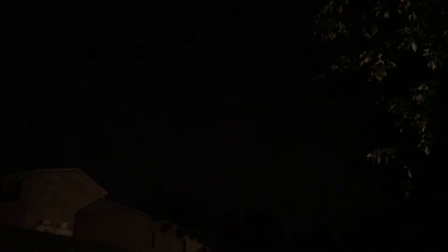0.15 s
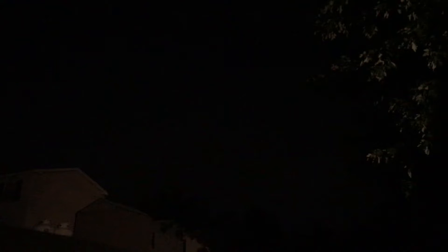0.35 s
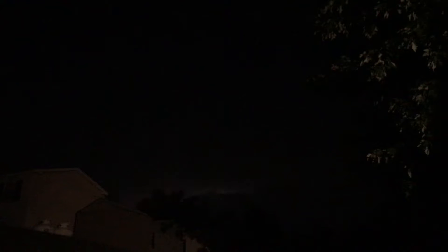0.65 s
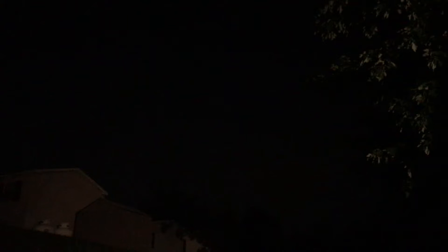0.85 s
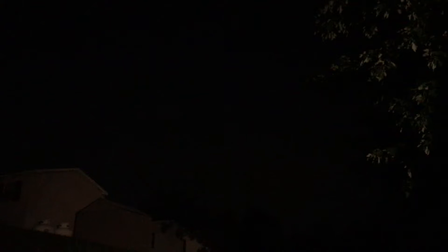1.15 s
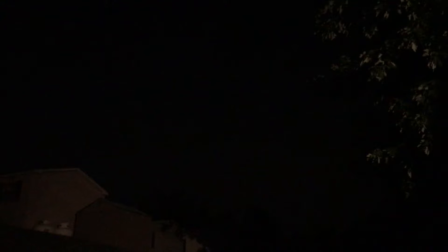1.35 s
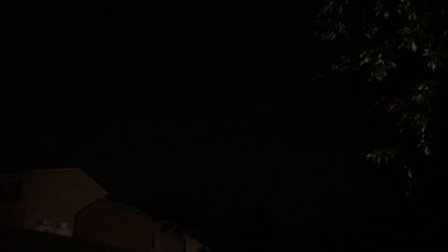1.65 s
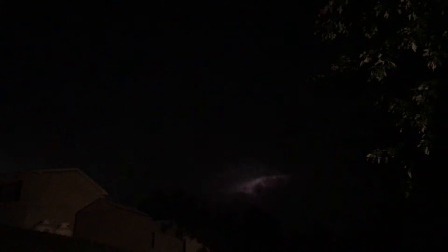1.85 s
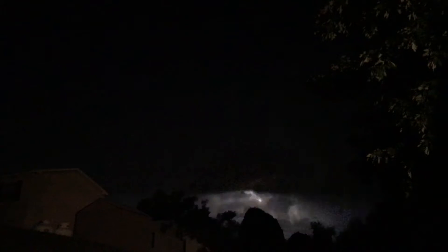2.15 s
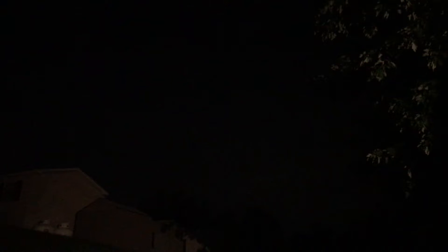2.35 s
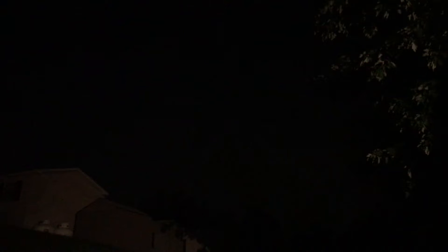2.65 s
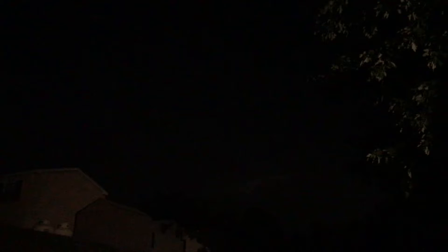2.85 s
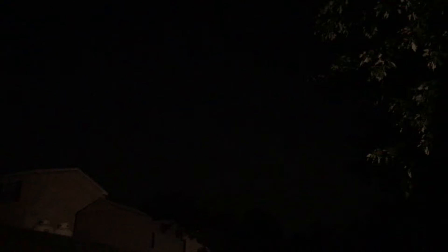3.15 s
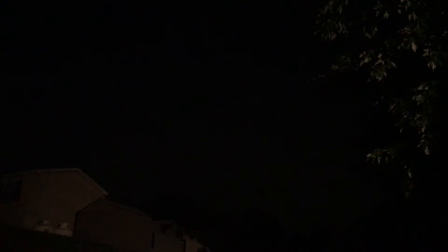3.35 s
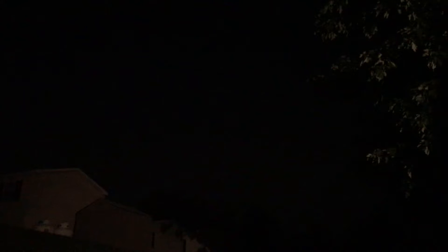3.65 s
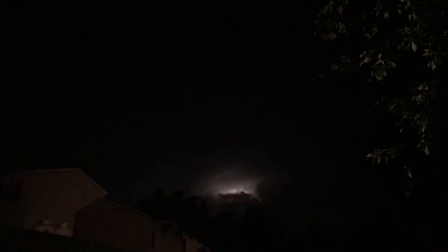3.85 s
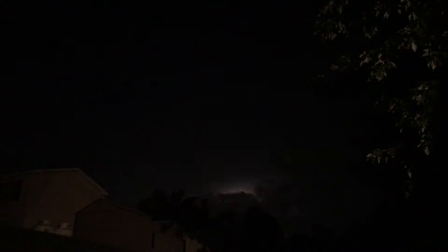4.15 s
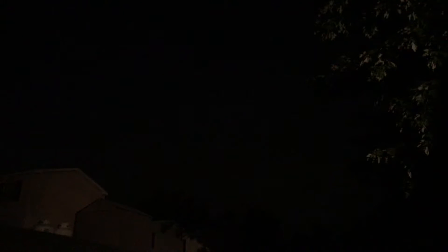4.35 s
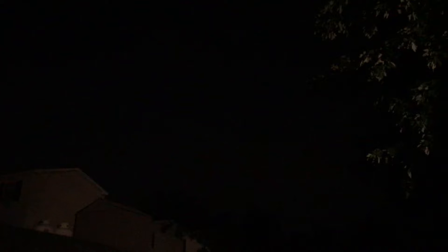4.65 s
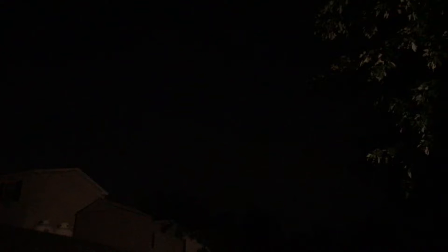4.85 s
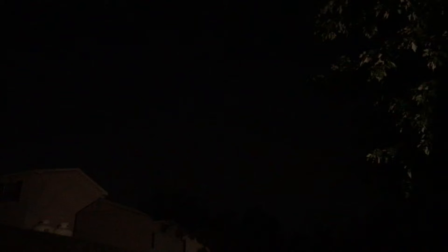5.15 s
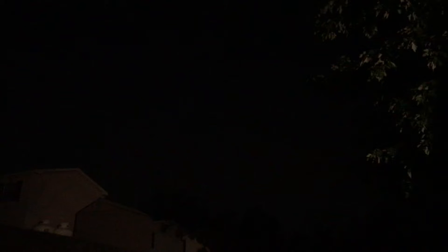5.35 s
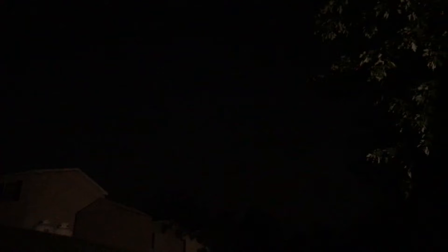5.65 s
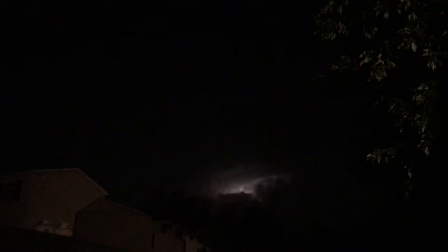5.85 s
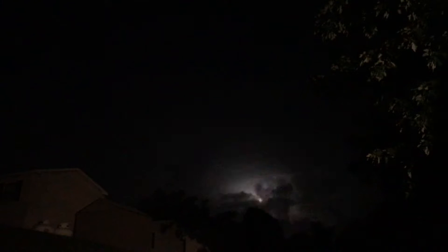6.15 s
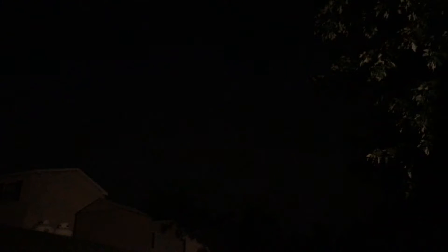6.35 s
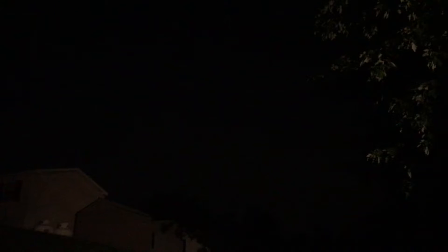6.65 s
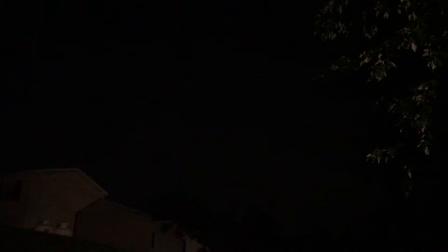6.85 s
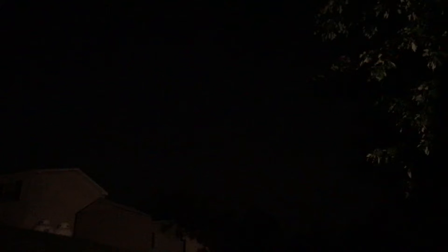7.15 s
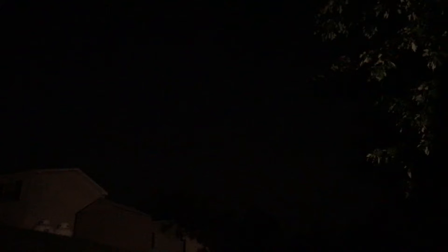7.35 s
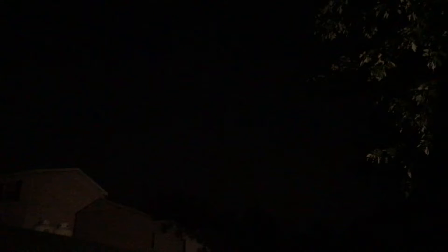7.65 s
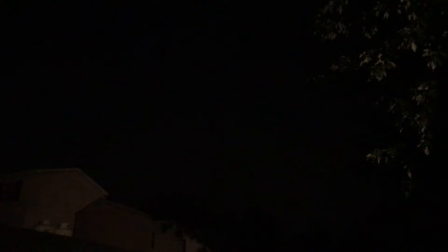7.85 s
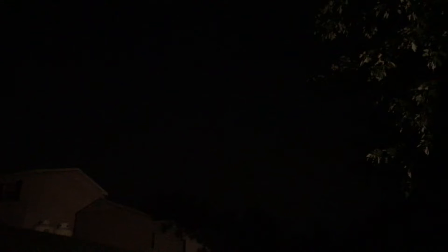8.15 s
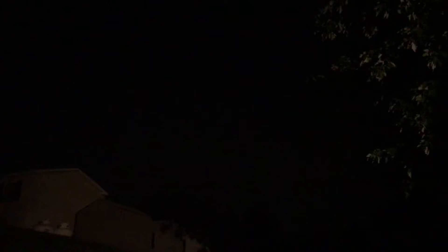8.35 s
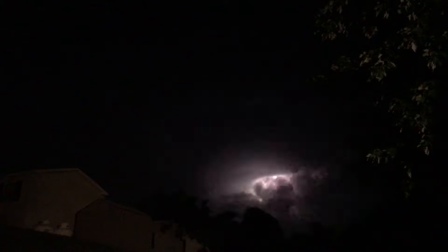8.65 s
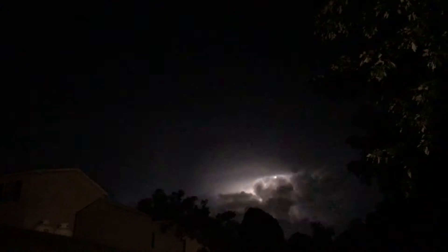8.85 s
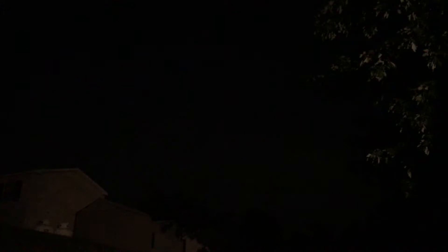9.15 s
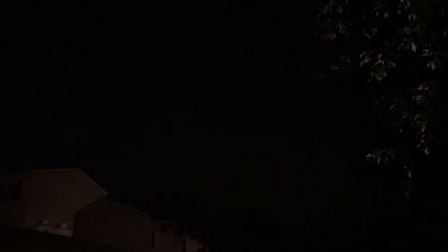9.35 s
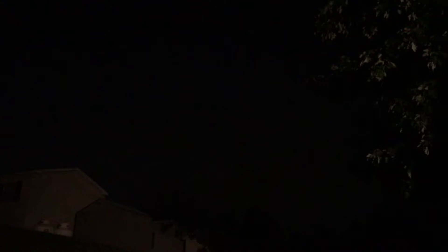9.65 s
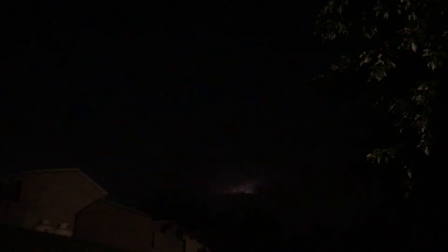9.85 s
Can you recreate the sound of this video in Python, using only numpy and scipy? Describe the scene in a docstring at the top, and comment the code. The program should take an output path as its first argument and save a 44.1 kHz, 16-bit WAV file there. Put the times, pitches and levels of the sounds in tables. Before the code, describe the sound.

A chorus of crickets throbs about four times a second on a warm night, with brief nearer trills, soft katydid rasps and a faint low machine hum.

```python
"""A chorus of small crickets throbs about four times a second in a yard on a warm night: noise rung by wings.
A nearer cricket trills now and then and another trills on, both as sliding tones; far ones blur into shimmer.
Katydids rasp as bursts of tooth noise over a swelling hiss of far ones. A cooling unit buzzes and hums in
steady and wavering sines over a low wash of coloured noise. One microphone feeds both channels."""
import sys
import numpy as np
from scipy import signal
from scipy.fft import rfft, irfft
from scipy.io import wavfile
from scipy.ndimage import uniform_filter1d

SR = 44100
rng = np.random.default_rng(int(sys.argv[2]) if len(sys.argv) > 2 else 0)


def level_to_linear(level):
    """Convert decibel levels to linear amplitude factors, elementwise."""
    exponent = np.asarray(level, float) / 20
    return 10 ** exponent


def unload_audio(sound):
    """Save the sound as a 16-bit wav file, at the path given as the first command line argument."""
    columns = np.transpose(np.atleast_2d(sound))
    # keep every value between -1 and 1, then stretch to whole-number steps
    steps = np.round(np.clip(columns, -1, 1) * 32767)
    wavfile.write(sys.argv[1], SR, steps.astype(np.int16))


N = 440559


def evened(x):
    """Scales to rms 1."""
    return x / np.sqrt(np.mean(x ** 2) + 1e-20)


def coloured(x, points):
    """Filters by (Hz, dB) points, interpolated over log frequency."""
    hz, db = np.transpose(points)
    bins_hz = np.fft.rfftfreq(len(x), 1 / SR)
    gain_db = np.interp(np.log(bins_hz + 1), np.log(hz + 1), db)
    return irfft(rfft(x) * level_to_linear(gain_db), len(x))


def slow(size):
    """Slow random wander of rms 1: noise smoothed twice over size samples."""
    once = uniform_filter1d(rng.standard_normal(N), size)
    return evened(uniform_filter1d(once, size))


def place(at_s, sounds):
    """Sums the rows of sounds, each centred on its time."""
    size = sounds.shape[1]
    middle = np.round(np.asarray(at_s) * SR).astype(int)[:, None]
    index = middle + np.arange(size) - size // 2 + SR  # a spare second at each end
    return np.bincount(index.ravel(), sounds.ravel(), N + 2 * SR)[SR:SR + N]


def strokes(hz, fall_hz, ms, edge, octave_db, phase=None):
    """Wing strokes: tones that slide down within each stroke, with a weak octave; one row a stroke."""
    u = np.linspace(-.5, .5, round(ms * SR / 1000))
    phase = rng.random(len(hz)) if phase is None else phase  # in turns
    turns = (hz[:, None] * u - fall_hz[:, None] * u ** 2 / 2) * ms / 1000 + phase[:, None]
    tone = np.sin(2 * np.pi * turns) + level_to_linear(octave_db) * np.sin(2 * 2 * np.pi * turns)
    return tone * signal.windows.tukey(len(u), edge)


def yard(x, wet_db, t60_s):
    """Walls and stirring leaves scatter a short dying tail: four noise tails, faded in and out in turn."""
    t = np.arange(SR // 4) / SR
    tails = rng.standard_normal((4, len(t))) * level_to_linear(-60 * t / t60_s) * (t > .004)
    tails /= np.linalg.norm(tails[0])
    turn = np.arange(N) / SR * 7 + np.arange(4)[:, None] * np.pi / 4  # 7 rad/s
    wet = signal.oaconvolve(x * np.sin(turn) ** 3, tails, axes=1)[:, :N].sum(0)
    return x + level_to_linear(wet_db) * wet


# Compressor buzz. Each row: multiple of the shaft speed, level in dB rms.
BUZZ_PARTIALS = [(4, -59), (6, -65), (10, -76), (12, -75), (13, -67), (14, -76), (16, -69), (18, -71),
                 (19, -75), (20, -64), (22, -65), (24, -72), (25, -64), (26, -77), (27, -70), (32, -77),
                 (35, -80), (44, -80), (45, -79), (46, -73), (47, -79), (48, -77), (49, -75), (51, -81),
                 (56, -80), (58, -80), (66, -81), (67, -74), (68, -75), (73, -76), (75, -81), (76, -79),
                 (78, -75), (79, -77), (81, -71), (82, -80), (83, -78), (87, -80)]
# Fan tones. Each row: mean frequency in Hz, level in dB rms.
FAN_TONES = [(56.1, -48.0), (112.2, -54.9), (240.1, -64.5), (468.7, -76.5), (477.8, -76.1), (506.3, -75.8),
             (512.3, -62.8)]


def cooling_unit():
    """Steady multiples of the compressor shaft speed, and fan tones whose pitch wavers a little."""
    SHAFT_HZ, WAVER_RMS = 58.3515, 0.00202  # waver as a share of the pitch
    t = np.arange(N) / SR
    buzz = sum(level_to_linear(db) * np.sin(2 * np.pi * (k * SHAFT_HZ * t + rng.random())) for k, db in BUZZ_PARTIALS)
    waver = evened(uniform_filter1d(rng.standard_normal((len(FAN_TONES), N)), SR // 4, axis=1))
    fan = np.zeros(N)
    for (hz, db), w in zip(FAN_TONES, waver):
        turns = hz * np.cumsum(1 + WAVER_RMS * w) / SR + rng.random()
        fan += level_to_linear(db) * np.sin(2 * np.pi * turns)
    return np.sqrt(2) * (buzz + fan)


# Neighbourhood wash and microphone hiss. Each row: frequency in Hz, relative density in dB per Hz.
WASH_COLOUR = [(20, -42), (35, -19), (55, 0), (95, -7), (125, -3), (230, -9), (440, -19.5), (750, -24.5),
               (1300, -23), (2000, -30), (2700, -28.5), (3600, -34), (4950, -30.5), (9000, -67),
               (15300, -50.5)]


def wash():
    """Smooth distant noise, mostly low."""
    WASH_DB = -43
    return level_to_linear(WASH_DB) * evened(coloured(rng.standard_normal(N), WASH_COLOUR))


# Far crickets by species. Each row: pitch in Hz, pitch spread in Hz rms, level in dB rms,
# strokes per second (up to 14000 strokes in all), stroke length in ms.
FAR_SPECIES = [(3170, 83, -65.5, 900, 14), (3930, 55, -73, 500, 16), (4733, 53, -70, 500, 12),
               (5396, 100, -60, 900, 10), (5763, 97, -56.5, 1500, 10.3), (6030, 97, -58.5, 470, 11.2)]


def far_crickets():
    """Many unseen singers: strokes at random moments, pitches scattered round each species."""
    out = np.zeros(N)
    for hz, spread_hz, level_db, per_s, ms in FAR_SPECIES:
        count = min(14000, round(per_s * N / SR))
        at, loud = rng.random((count, 2)).T
        pitch_hz = hz + spread_hz * rng.standard_normal(count)
        sounds = (0.99 + loud)[:, None] * strokes(pitch_hz, .02 * pitch_hz, ms, 0.83, -41)
        out += level_to_linear(level_db) * evened(place(at * N / SR, sounds))
    return out


def triller():
    """An unbroken run of falling strokes in the middle distance; its level wavers slowly."""
    RATE_PER_S, LEVEL_DB, WAVER_DB, UNEVEN_DB = 86.2, -53, 2.5, 0.83
    at_s = np.arange(0, N / SR, 1 / RATE_PER_S)
    late, loud = rng.standard_normal((len(at_s), 2)).T
    waver = slow(size=9000)[(at_s * SR).astype(int)]
    size = level_to_linear(LEVEL_DB + WAVER_DB * waver + UNEVEN_DB * loud)
    tones = strokes(np.full(len(at_s), 5600), np.full(len(at_s), 800), 9.3, 0.44, -45)
    return yard(place(at_s + .0004 * late, size[:, None] * tones), -6.5, 0.09)


# Colour of the far katydids' hiss. Each row: frequency in Hz, relative density in dB per Hz.
HISS_COLOUR = [(5500, -20), (6200, -7.5), (8000, 1.5), (9500, -4), (11500, -16.5), (13000, -15),
               (15000, -40)]
# Swells of that hiss. Each row: middle in seconds, peak in dB before flutter, added in power to the floor.
HISS_SWELLS = [(.25, -63), (1.3, -60), (1.87, -60), (2.4, -62), (3.6, -63), (4.45, -63), (5.4, -62.5),
               (6.42, -64), (7.0, -64), (7.45, -59), (8.35, -58), (9.45, -62.5)]


def far_katydids():
    """Far katydids blur to a fluttering hiss: coloured noise with bell-shaped swells, about one a second."""
    SWELL_S, FLOOR_DB, FLUTTER_DB = 0.17, -65.5, 1.6
    t = np.arange(0, N, 100) / SR
    power = level_to_linear(FLOOR_DB) ** 2
    power = power + sum(level_to_linear(db) ** 2 * np.exp(-((t - s) / SWELL_S) ** 2) for s, db in HISS_SWELLS)
    level = np.interp(np.arange(N) / SR, t, np.sqrt(power)) * level_to_linear(FLUTTER_DB * slow(size=1800))
    return level * evened(coloured(rng.standard_normal(N), HISS_COLOUR))


# Near cricket trills. Each row: first stroke in seconds, last stroke in seconds, strokes,
# stroke peak in dB before unevenness and echoes.
NEAR_TRILLS = [(.0035, 0.168, 12, -32), (1.823, 2.008, 13, -33.5), (4.001, 4.154, 11, -33),
               (5.457, 5.606, 11, -33), (6.939, 7.106, 12, -33), (8.698, 8.85, 11, -33)]


def near_cricket():
    """Even strokes near 66 a second; the first is low and faint, pitch later sags, and a wall sends them back."""
    OCTAVE_DB, ECHO_DB, ECHO_S = -40, -13, .0135
    out = np.zeros(N)
    for first_s, last_s, count, level_db in NEAR_TRILLS:
        k = np.arange(round(count))
        pitch, loud, slip = rng.standard_normal((len(k), 3)).T
        at_s = np.round(np.linspace(first_s, last_s, len(k)) * SR) / SR
        hz = 5865 - 280 * np.exp(-k / 1.0) - 40 * (k / k[-1]) ** 2 + 10 * pitch
        size = level_to_linear(level_db - 11 * np.exp(-k / .55) + 1.8 * loud)
        phase = 5816 * at_s + .11 * slip  # the wing rings on from stroke to stroke
        tones = strokes(hz, np.full(len(k), 110), 12.1, 0.73, OCTAVE_DB, phase)
        out += place(at_s, size[:, None] * tones)
    echo = np.pad(out, (round(ECHO_S * SR), 0))[:N]
    return yard(out + level_to_linear(ECHO_DB) * echo, -7, 0.24)


# What the chorus wings radiate. Each row: frequency in Hz, relative density in dB per Hz.
WING_COLOUR = [(5500, -63), (6350, -26), (6530, -16), (6870, -2.5), (7210, 3), (7400, -0.5), (7590, -13.5),
               (7730, -26), (8300, -44.5)]
# Singers fall in and out of step. Each row: time in seconds, lateness behind the beat in ms,
# spread of the singers in ms (rms is 0.573 of it).
STEP_DRIFT = [(0, -4, 37), (.5, -1, 34), (1.2, -18.5, 27), (1.9, -19, 38), (2.8, -26, 50), (3.6, -17, 49),
              (4.1, -4, 49), (4.36, 0, 28), (5.45, -1.5, 32), (5.8, -10, 50), (6.3, -1, 44),
              (6.75, -16, 33), (7.45, -14.5, 31), (7.72, -17, 44), (8.4, -11.5, 48), (10, 4.5, 54)]


def chorus():
    """At each throb every singer gives a swelling run of raspy strokes, a little early or late."""
    SINGERS, STROKES, THROBS = 10, 6, 42
    FIRST_THROB_S, BEAT_S, STROKE_GAP_S = .04, .24012, .024
    CHORUS_DB, THROB_UNEVEN_DB, FLOOR_DB = -38.5, .5, -9  # floor relative to a full stroke
    beat_s = FIRST_THROB_S + BEAT_S * np.arange(THROBS)
    when_s, late_ms, spread_ms = np.transpose(STEP_DRIFT)
    # axes: throb, singer, stroke
    throb_s = (beat_s + np.interp(beat_s, when_s, late_ms) / 1000)[:, None, None]
    spread_ms = np.interp(beat_s, when_s, spread_ms)[:, None, None]
    throb_db = THROB_UNEVEN_DB * rng.standard_normal(throb_s.shape)
    late, loud = rng.standard_normal((2, THROBS, SINGERS, 1))
    late = (late - late.mean(1, keepdims=True)) / late.std(1, keepdims=True)
    step = np.arange(STROKES) - (STROKES - 1) / 2
    gap_s = STROKE_GAP_S + 0.0014 * rng.standard_normal((SINGERS, 1))
    at_s = throb_s + spread_ms / 1000 * 0.573 * late + step * gap_s
    size = level_to_linear(throb_db - 0.77 * step ** 2 + 2.0 * loud + 0.71 * rng.standard_normal(at_s.shape))
    shape = signal.windows.tukey(round(.024 * SR), .7)
    power = place(at_s.ravel(), size.reshape(-1, 1) ** 2 * shape ** 2)
    effort = np.sqrt(power + level_to_linear(FLOOR_DB) ** 2)
    # uneven tooth strikes ring the wing, and faintly its octave
    teeth = effort * rng.standard_normal((2, N))
    wing = evened(coloured(teeth[0], WING_COLOUR))
    octave = evened(coloured(teeth[1], [(2 * hz, .7 * db) for hz, db in WING_COLOUR]))
    song = yard(wing + level_to_linear(-41) * octave, -7.5, 0.089)
    return evened(song) * level_to_linear(CHORUS_DB)


# Katydid calls of even rasps. Each row: first rasp in seconds, last rasp in seconds, rasps,
# mid-call level in dB before unevenness and the yard, brightness in dB per kHz.
KATYDID_CALLS = [(.51, 0.62, 3, -60, -1), (3.065, 3.336, 6, -51, -4.5), (4.24, 4.405, 4, -54, -3.5),
                 (4.995, 5.265, 5, -60, -2.5), (8.725, 8.895, 4, -57, -3.5)]


def katydids():
    """Each rasp is a quick run of tooth strikes: spiky noise, broad and falling toward the treble."""
    CALL_ENDS_DB, RASP_UNEVEN_DB, RASP_S = -2.5, 1, .052  # first and last rasps are softer
    rows = []
    for first_s, last_s, count, db, tilt in KATYDID_CALLS:
        for u in np.linspace(0, 1, round(count)):
            rows.append((first_s + u * (last_s - first_s), db + CALL_ENDS_DB * (2 * u - 1) ** 2, tilt))
    at_s, level_db, tilt_db = np.transpose(rows)
    level_db = level_db + RASP_UNEVEN_DB * rng.standard_normal(len(at_s))
    u = np.linspace(0, 1, round(RASP_S * SR))
    shape = (len(at_s), len(u))
    teeth = rng.standard_normal(shape) * (.7 + (rng.random(shape) < .05))
    hz = np.fft.rfftfreq(len(u), 1 / SR)
    band = 1 / (1 + (7000 / (hz + 1)) ** 12) / (1 + (hz / 12800) ** 16)
    colour = level_to_linear(tilt_db[:, None] * (hz - 8300) / 1000) * band
    rasp = irfft(rfft(teeth) * colour, len(u))
    rasp /= rasp.std(1, keepdims=True)
    rasp *= np.sin(np.pi * u ** 0.49) ** 2  # rises faster than it falls
    return yard(place(at_s, level_to_linear(level_db[:, None]) * rasp), 3, 0.21)


def scene():
    """All sources reach one microphone, copied to both channels."""
    insects = far_crickets() + triller() + far_katydids() + near_cricket() + chorus() + katydids()
    mono = cooling_unit() + wash() + insects
    return np.array([mono, mono])


def roll_off(x):
    """The treble ends steeply here."""
    return signal.sosfilt(signal.butter(12, 16330, fs=SR, output="sos"), x)


def record(dry):
    """Limits the band with a steep linear-phase low-pass."""
    EDGE_HZ = 15740
    edge = signal.firwin(2047, EDGE_HZ, window=("kaiser", 8), fs=SR)
    mix = signal.oaconvolve(dry, edge[None], "same")
    return roll_off(mix)


dry = scene()
out = record(dry)
unload_audio(out)
```